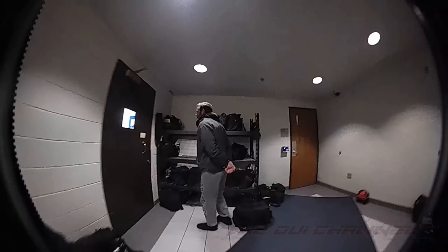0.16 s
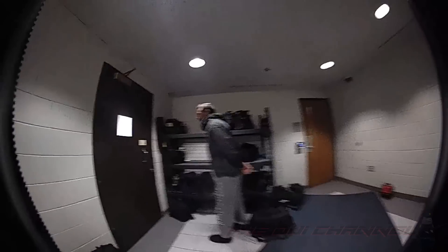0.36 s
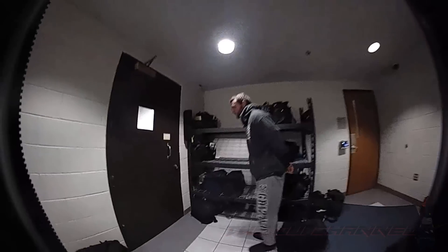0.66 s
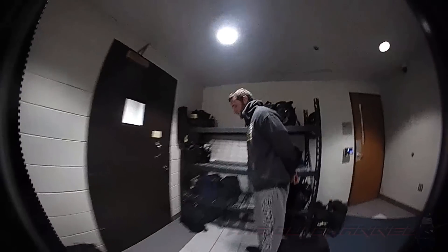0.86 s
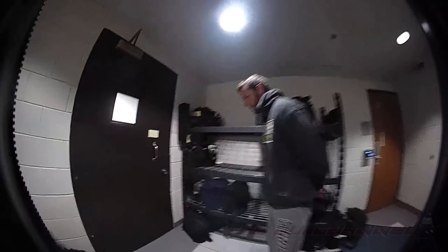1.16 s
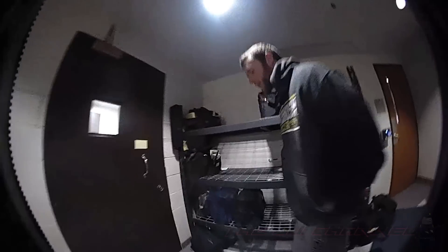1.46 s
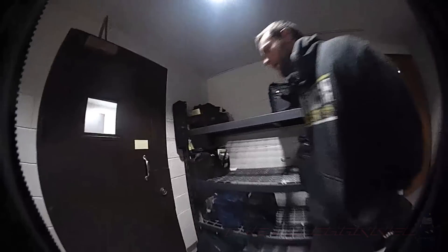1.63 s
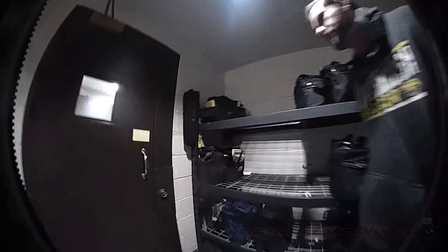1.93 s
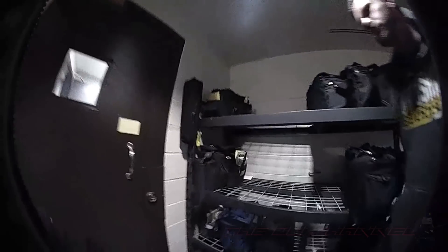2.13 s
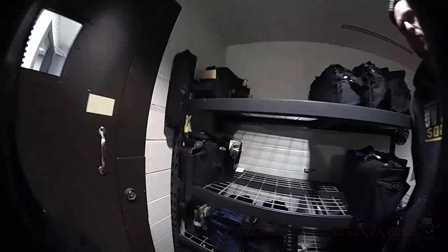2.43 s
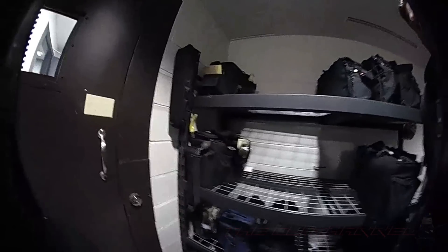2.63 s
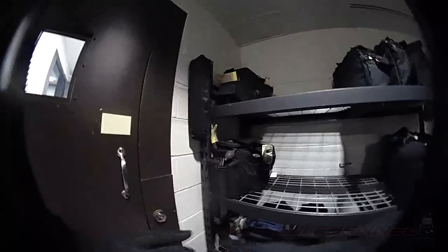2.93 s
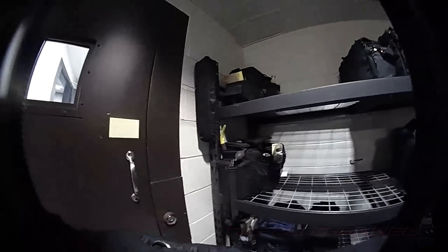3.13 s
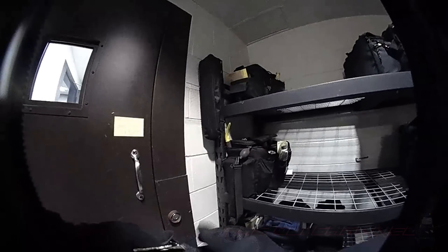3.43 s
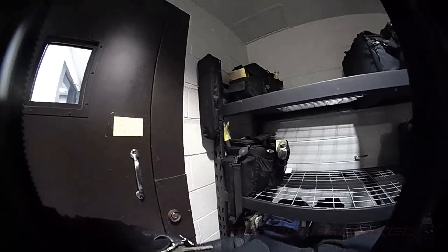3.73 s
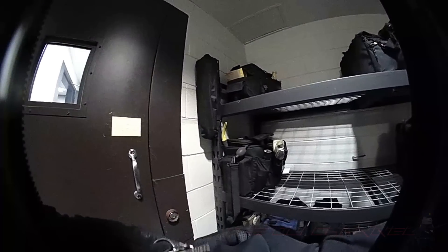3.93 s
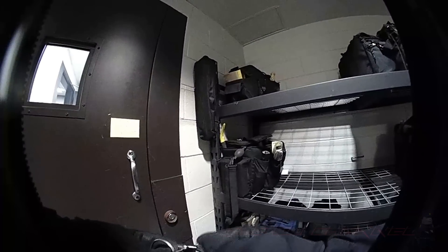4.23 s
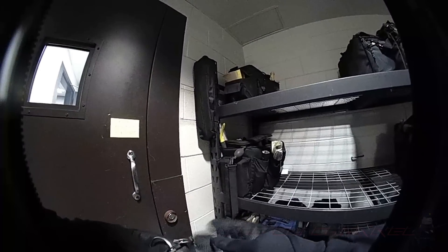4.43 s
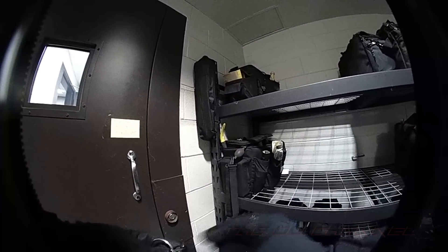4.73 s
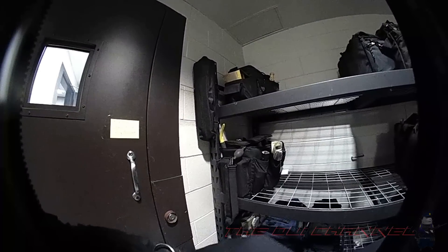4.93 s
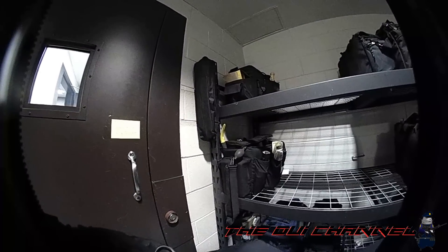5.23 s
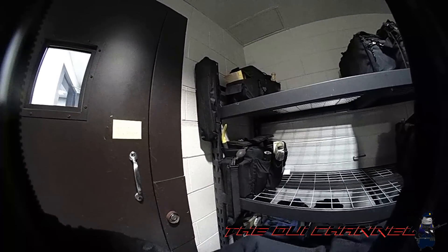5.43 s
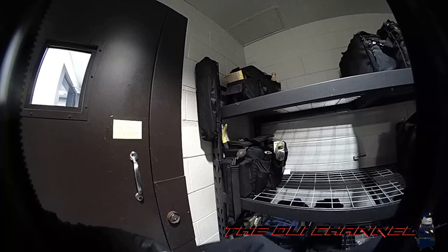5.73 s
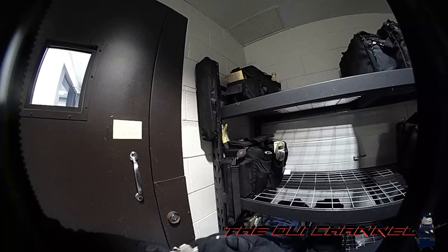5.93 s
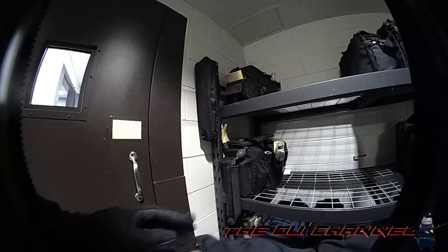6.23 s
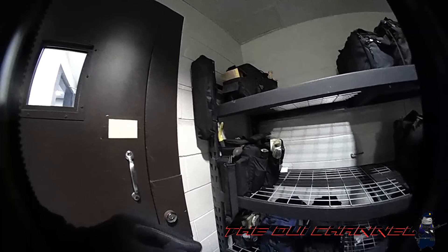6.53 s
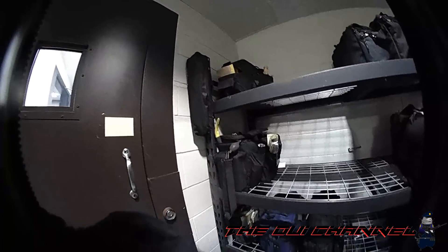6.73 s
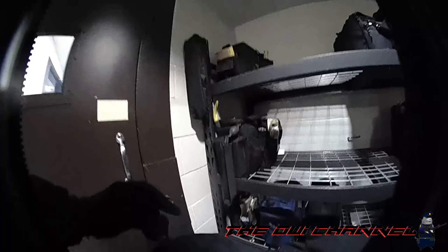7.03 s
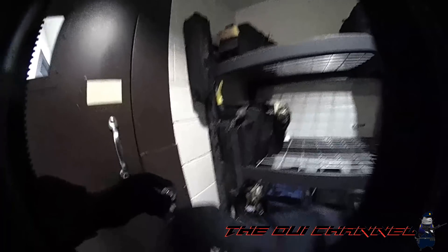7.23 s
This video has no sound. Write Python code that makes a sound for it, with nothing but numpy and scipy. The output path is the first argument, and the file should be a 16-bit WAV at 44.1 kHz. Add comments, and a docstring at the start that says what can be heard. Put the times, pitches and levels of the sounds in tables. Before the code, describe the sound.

A bunch of keys clicks and jingles close to a body-worn microphone in a small, slightly echoing hallway. Before the keys come soft footfalls, swishing clothes, hollow thumps with a brief rumble of air, and one sharp hand slap. The keys start with a quick cluster, thin to scattered ticks, then rattle with short bright rings. A dull knock comes last, and ventilation hums quietly throughout.

```python
"""A small block-walled hallway, heard from a microphone worn on the body. Ventilation hums throughout.
First the wearer steps toward a door: clothing swishes by friction, air buffets the microphone, and near
1 s heavy bumps set something hollow booming. Sleeves rustle, and at 2.6 s a slap of hands rings the air
cupped between them. From 2.8 s the wearer sorts a bunch of keys: they click against each other, and now
and then one hangs free and rings. Dull knocks come last, echoing briefly between the hard walls."""
import sys
import numpy as np
from scipy import signal
from scipy.fft import rfft, irfft, next_fast_len
from scipy.io import wavfile

SR = 44100
rng = np.random.default_rng(int(sys.argv[2]) if len(sys.argv) > 2 else 0)


def wav_out(sig):
    """Save sig, one row per channel (or a flat mono array), as 16-bit PCM at SR to the path in sys.argv[1]."""
    wavfile.write(sys.argv[1], SR, np.round(np.clip(np.atleast_2d(sig).T, -1, 1) * 32767).astype(np.int16))


N = 325017
T = np.arange(N) / SR

# harmonics of the ventilation motor: f/Hz, level/dB
MOTOR_HARMONICS = [(59.6, -60.5), (119.3, -62), (179.5, -66), (238, -82.5)]
# noise spectra of the vent, the jacket and the sleeves: f/Hz, relative spectral level/dB
VENT_SPECTRUM = [(18, 7.5), (39, -2), (75, -7), (139, -4), (291, -13), (627, -22), (900, -31), (3500, -27),
                 (5200, -38), (7600, -52), (10400, -27.5), (14700, -30.5), (16000, -69)]
JACKET_SPECTRUM = [(88, -47), (150, 9), (193, -5.5), (249, -2), (376, -3.5), (612, -6), (1340, -9),
                   (1500, -16), (1980, -10.5), (2810, -12.5), (4760, -11), (10400, -26.5), (11700, -29),
                   (14200, -31), (16000, -69)]
SLEEVE_SPECTRUM = [(88, -48), (150, -7), (226, -4), (321, -2), (504, -1), (979, -5.5), (1190, -3.5),
                   (3040, -5), (5150, -7), (7920, -13.5), (8730, -14.5), (10200, -10.5), (11500, -19.5),
                   (14800, -14.5), (16000, -65)]
# rumble of air passing the microphone as the wearer walks, then stands: t/s, level/dB
AIR_RUMBLE = [(0, -39), (.75, -40), (1.03, -13.5), (1.27, -15), (1.42, -32.5), (1.95, -42.5), (3.12, -39.5),
              (4.2, -48), (5.9, -50.5), (7.37, -42)]
# jacket friction while walking; a faster rub is brighter: t/s, level/dB, brightness/dB
JACKET_RUB = [(0, -51, -2), (.19, -54, 0), (.27, -46.5, -6), (.46, -50, -6), (.6, -52, 2), (.815, -49.5, 5),
              (.838, -35.5, -1), (.89, -30, -2.5), (.965, -32, -1), (1.01, -22.5, 1), (1.045, -29, -2.5),
              (1.2, -29, -10), (1.32, -41.5, -6.5), (1.47, -43.5, -16), (1.55, -50.5, -14), (1.62, -82, 0)]
# knocks and footfalls: t/s, level/dB, centre f/Hz, T60/s, scuff re body/dB
KNOCKS = [(.226, -29.5, 420, 0.32, -12.5), (.285, -34, 314, 0.3, -4.5), (0.829, -43.5, 1056, 0.13, 14),
          (1.382, -35, 390, 0.29, -14), (2.016, -37, 140, 0.11, -10), (2.275, -25.5, 1420, 0.022, -18),
          (6.861, -37, 740, 0.016, -12), (7.289, -31, 370, 0.11, -11), (7.29, -34, 172, 0.29, -10),
          (7.292, -33.5, 1610, 0.031, -24)]
# short noise swells (a footstep's scuff, fabric swishes, the hand slap's dying tail):
# peak t/s, level/dB, lower f/Hz, upper f/Hz, rise/s, fall/s
NOISE_SWELLS = [(.228, -39, 1220, 2820, 0.034, 0.031), (.27, -47, 5430, 7600, 0.04, 0.078),
                (0.721, -41.5, 3900, 9300, 0.099, .14), (1.008, -21.5, 259, 5360, 0.018, 0.024),
                (1.1, -30, 750, 4700, 0.049, 0.037), (1.186, -30.5, 2570, 8160, 0.0071, 0.046),
                (1.577, -39, 3100, 7050, 0.0033, 0.021), (1.645, -40, 6000, 12900, .005, 0.02),
                (1.691, -32.5, 6470, 12000, 0.0025, 0.0034), (2.597, -22, 4530, 14200, 0.0061, .016),
                (2.627, -30, 700, 13000, .005, 0.042), (2.628, -35.5, 495, 1060, 0.02, 0.11),
                (2.748, -23, 3420, 5250, .004, .0022), (2.776, -27, 480, 3350, 0.022, 0.01),
                (2.783, -18.5, 4430, 13300, .0078, .0077)]
# heavy bumps against something hollow: t/s, level/dB, T60/s
BUMPS = [(0.886, -21.5, 0.55), (.985, -25, 0.77), (1.102, -34, 0.41)]
# modes of the hollow body: f/Hz, spread of f (four standard deviations)/Hz, relative level/dB
HOLLOW_MODES = [(95.5, 4, -1), (196.7, 12, -8), (378, 18.5, -7.5)]
# steady rubbing of sleeves and gloves: t/s, level/dB
SLEEVE_RUB = [(1.5, -58.5), (1.6, -57), (2.5, -55), (2.7, -47.5), (2.95, -47), (3.5, -55), (4.4, -65),
              (5.25, -70), (5.7, -65), (6.05, -62), (6.3, -57), (6.8, -60), (7.0, -51.5), (7.37, -49)]
# single rustles of the sleeves: peak t/s, level/dB, Gaussian half-width/s
SLEEVE_RUSTLES = [(1.68, -48.5, 0.07), (2.04, -56, 0.052), (2.367, -46, 0.011), (2.547, -48.5, 0.012),
                  (2.82, -45, 0.023), (4.057, -62, 0.038), (4.748, -53.5, 0.057), (4.975, -53, 0.04),
                  (5.169, -57.5, 0.02), (5.412, -60.5, 0.082), (5.87, -61.5, 0.14)]
# resonances of the air cupped between the hands: f/Hz, bandwidth/Hz, gain/dB
HAND_CAVITY_MODES = [(483, 57, -3.5), (866, 38, 3), (1137, 103, 4.5), (1720, 370, -7.5), (2230, 240, -5.5),
                     (2800, 290, -4), (5460, 900, -23), (7200, 1100, -20)]
# clear touches of key on key: t/s, mid-band level over 10 ms/dB, top band re mid/dB, chatter T60/s
KEY_TOUCHES = [(2.78, -23.5, -6.5, 0.012), (2.981, -45, -4, .017), (2.9983, -38.5, 6, 0.039),
               (3.0448, -37, -7, 0.03), (3.057, -30, -9, 0.025), (3.068, -26, 1.5, 0.084),
               (3.0858, -29.5, -2, 0.037), (3.098, -37, -2, .017), (3.1082, -26.5, -5, 0.093),
               (3.1262, -26, 4, 0.019), (3.142, -26.5, 6.5, 0.064), (3.1569, -23.5, -1.5, 0.0091),
               (3.268, -45, -10, 0.0096), (3.353, -49, 2, 0.0089), (3.37, -38.5, -3, 0.011),
               (3.3756, -40, 2, .007), (3.4198, -43, 3, .006), (3.428, -41, 4, 0.011),
               (3.4626, -39.5, -17, 0.0073), (3.5875, -25.5, -15, 0.0053), (3.5975, -21.5, -17, 0.0042),
               (3.6882, -42, -12, .018), (3.7026, -30, -19, 0.036), (3.7755, -37.5, -21, 0.0068),
               (3.794, -39, 2.5, .015), (3.941, -39, 0, 0.0038), (4.104, -45, -5, 0.02),
               (4.123, -43.5, -5, 0.032), (4.5303, -41, -16, 0.024), (4.5586, -46.5, 1, 0.007),
               (4.7559, -34.5, -5, 0.019), (5.075, -38.5, -6, 0.012), (5.1548, -52.5, -1, .023),
               (5.7941, -36, -1, .026), (5.829, -42, -10, .07), (5.8485, -43, 1, .04),
               (5.8652, -44, -2, .06), (5.876, -32.5, 0.5, .018), (6.098, -41.5, 9, 0.047),
               (6.130, -27, -15, 0.021), (6.139, -30, -5, 0.072), (6.147, -36, 2, 0.12),
               (6.164, -33, 0, 0.044), (6.186, -33, 4, 0.044), (6.1981, -31, -1, 0.081),
               (6.22, -40, 3, 0.03), (6.2414, -35.5, 6, 0.065), (6.263, -29.5, -4, .028),
               (6.272, -32.5, 5.5, .016), (6.3003, -31.5, 6, 0.027), (6.3083, -28, -7, 0.018),
               (6.3197, -32.5, -2, 0.025), (6.3812, -32, -2, 0.064), (6.422, -33, -5, 0.068),
               (6.4533, -38, -8, 0.093), (6.5144, -37.5, 4, 0.016), (6.6495, -37, -7, 0.046),
               (6.7426, -48, 6, 0.011), (6.864, -39, -3, 0.028), (6.8781, -30, 1, 0.097),
               (6.9247, -36.5, -5, 0.033), (6.938, -29, 0, 0.13), (6.9563, -33, -1, 0.11),
               (7.0506, -33, 0.5, 0.014), (7.115, -43.5, 6, 0.0076), (7.1637, -39, -22, 0.019),
               (7.173, -36, -6, .007), (7.185, -34.5, -4.5, 0.051), (7.226, -33, -10, 0.021)]
# resonances of the bunch, damped by the fingers: f/Hz, bandwidth/Hz, gain/dB
BUNCH_MODES = [(1410, 710, -7), (2220, 450, 2), (3290, 360, -2.5), (3910, 110, 7), (4980, 1110, 5.5),
               (5620, 410, 9), (6050, 170, 6.5), (7330, 620, 9), (8480, 910, 0), (10330, 1270, 1),
               (11300, 170, 2.5), (12500, 1100, -4), (13430, 1040, 0)]
# modes of a neighbouring key that is not held: f/Hz, level re touch/dB, T60/s
NEIGHBOUR_MODES = [(4200, -37, .08), (5060, -43, 0.1), (5210, -7.5, 0.064), (5940, -26, 0.18),
                   (7300, -11, 0.072), (10600, -15, 0.06), (12700, -21, 0.073)]
# struck keys hanging free until fingers or neighbours catch them: t/s, mode name, level/dB, time free/s
FREE_KEYS = [(3.044, "clink", -26.5, 0.0016), (3.07, "ping", -23, 0.0018), (3.59, "tick", -32, .001),
             (3.6, "ping", -32, 0.0026), (3.598, "clank", -36, 0.0027), (3.702, "ping", -28, 0.0018),
             (3.942, "chime", -47, 0.02), (4.125, "chime", -54, .02), (4.532, "ping", -45, .004),
             (4.755, "ping", -35.5, 0.0034), (4.757, "tick", -25, 0.0014), (5.093, "tink", -35, 0.0025),
             (6.098, "shimmer", -41, 0.023), (6.098, "glint", -42, 0.013), (6.129, "clank", -42, 0.016),
             (6.147, "shimmer", -27, 0.037), (6.134, "ting", -36, 0.068), (6.144, "ping", -27.5, .004),
             (6.148, "glint", -42, .03), (6.176, "ping", -33, .004), (6.242, "bell", -21, .023),
             (6.31, "ping", -30.5, 0.0036), (6.311, "clank", -41.5, 0.0026), (6.346, "ping", -37.5, .004),
             (6.381, "ping", -33.5, .003), (6.421, "shimmer", -32.5, .003), (6.44, "ping", -35, .003),
             (6.65, "shimmer", -48, 0.038), (6.743, "glint", -52, .02), (6.881, "shimmer", -34, .017),
             (6.88, "glint", -37, .015), (6.938, "shimmer", -30, 0.016), (6.957, "shimmer", -22, 0.0067),
             (7.178, "shimmer", -45, 0.054), (7.224, "ping", -34, .004)]
# modes of a free key, by name: f/Hz, T60 once caught/s, relative level of the lingering tone/dB
FREE_KEY_MODES = {"clank": (1410, 0.022, -32), "clink": (2950, 0.012, -30), "ping": (3935, 0.033, -28),
                  "tink": (4420, .02, -36), "chime": (5205, 0.21, -30), "bell": (5583, .015, -18),
                  "ting": (6300, .06, -30), "tick": (7600, 0.012, -37), "shimmer": (11020, 0.07, -27),
                  "glint": (12310, .08, -22)}
# first reflections off the chest, floor and door: delay/s, amplitude ratio
REFLECTIONS = [(.0026, 0.049), (.0052, 0.12), (.0079, 0.078)]


def from_db(db):
    return 10 ** (np.asarray(db) / 20)


def unit_rms(x):
    return x / np.sqrt(np.mean(x ** 2) + 1e-20)


def curves(rows):
    """Each column after t, interpolated linearly to every sample."""
    times, *columns = np.transpose(rows)
    return [np.interp(T, times, column) for column in columns]


def add(out, start_s, sound):
    at = max(round(start_s * SR), 0)
    out[at:at + len(sound)] += sound[:max(N - at, 0)]


def band(x, low_hz, high_hz, order=2):
    return signal.sosfilt(signal.butter(order, [low_hz, high_hz], "band", fs=SR, output="sos"), x)


def resonate(force, modes):
    """Modal superposition: damped resonators share one force and are summed with alternating signs."""
    out = 0
    for k, (hz, width_hz, db) in enumerate(modes):
        radius = np.exp(-np.pi * width_hz / SR)
        feedback = [1, -2 * radius * np.cos(2 * np.pi * hz / SR), radius ** 2]
        gain = (-1) ** k * from_db(db) * (1 - radius ** 2) / 2
        out = out + gain * signal.lfilter([1, 0, -1], feedback, force + 1e-18)
    return out


def drift(points_per_s):
    """Random fluctuation of unit rms, linear between independent values."""
    return unit_rms(np.interp(T * points_per_s, np.arange(4000), rng.standard_normal(4000)))


def coloured(noise, spectrum, low_hz=15, high_hz=20000):
    """Spectral shaping of noise within one band, to unit rms."""
    size = next_fast_len(N)
    hz = np.maximum(np.arange(size // 2 + 1) * SR / size, 1)
    points_hz, points_db = np.transpose(spectrum)
    gain = from_db(np.interp(np.log(hz), np.log(points_hz), points_db))
    rolloff = np.sqrt((1 + (low_hz / hz) ** 12) * (1 + (hz / high_hz) ** 12))
    return unit_rms(irfft(rfft(noise, size) * gain / rolloff, size)[:N])


def ventilation(air_db=-52.5, waver_db=2.5, wander_rad=0.99):
    """Steady flow noise lies under motor harmonics, slightly modulated in amplitude and phase."""
    hum = 0
    for hz, db in MOTOR_HARMONICS:
        amplitude = np.sqrt(2) * from_db(db + waver_db * drift(5.7))
        hum = hum + amplitude * np.sin(2 * np.pi * hz * T + wander_rad * drift(3.5))
    return hum + from_db(air_db) * coloured(rng.standard_normal(N), VENT_SPECTRUM)


def air_buffet():
    """Flow across the microphone port makes pressure fluctuations: slow heaves and a softer flutter."""
    rumble_db, = curves(AIR_RUMBLE)
    flutter_db = -44.5 + 0.33 * rumble_db
    rumble = unit_rms(band(rng.standard_normal(N), 6, 26, order=3))
    flutter = unit_rms(band(rng.standard_normal(N), 50, 210))
    return from_db(rumble_db) * rumble + from_db(flutter_db) * flutter


def cloth_friction(levels_db, spectrum, grain_db, flutter_db):
    """Stick-slip friction: threads catch and slip in tiny grains under a fluttering pressure."""
    out, pressure = 0, from_db(flutter_db * drift(110))
    bands_hz = ((170, 1000), (1000, 4000), (4000, 16000))  # body, rub, hiss
    for level_db, edges_hz in zip(levels_db, bands_hz):
        grains = rng.standard_normal(N) * from_db(grain_db * np.minimum(rng.exponential(1, N), 6))
        out = out + from_db(level_db) * coloured(grains * pressure, spectrum, *edges_hz)
    return out


def jacket():
    """Friction noise swells with the stride; faster sliding shifts its energy upward in frequency."""
    db, bright_db = curves(JACKET_RUB)
    body_db, rub_db, hiss_db = db - 1.5, db - 1 + bright_db, db - 1 + 1.5 * bright_db
    return cloth_friction((body_db, rub_db, hiss_db), JACKET_SPECTRUM, grain_db=1.5, flutter_db=1.23)


def knocks(relative_bandwidth=0.29):
    """A dull impact excites one heavily damped resonance, while the surfaces scuff."""
    out, t = np.zeros(N), T[:SR // 2]
    for start_s, db, hz, t60, scuff_db in KNOCKS:
        body_noise, scuff_noise = rng.standard_normal((2, len(t)))
        decay = from_db(-60 * t / t60)
        resonance = resonate(body_noise, [(hz, hz * relative_bandwidth, 0)])
        body = unit_rms(band(resonance, hz / 2, hz * 2, order=1) * decay)
        scuff = unit_rms(band(scuff_noise, 460, 5000) * decay)
        rms = from_db(db) * np.sqrt(np.mean(decay ** 2))
        add(out, start_s, rms * (body + from_db(scuff_db) * scuff))
    return out


def noise_swells(lead_s=0.25):
    """Exponential growth and decay of band noise: a footstep's scuff, fabric swishes, the slap's tail."""
    out, t = np.zeros(N), T[:SR // 2] - lead_s
    for peak_s, db, low_hz, high_hz, rise_s, fall_s in NOISE_SWELLS:
        swell = np.exp(np.minimum(t / rise_s, -t / fall_s))
        noise = unit_rms(band(rng.standard_normal(len(t)), low_hz, high_hz))
        add(out, peak_s - lead_s, from_db(db) * swell * noise)
    return out


def hollow_bumps(push_s=0.0071):
    """A soft, heavy push excites the low modes of a hollow body, which decay slowly."""
    out, t = np.zeros(N), T[:SR // 2]
    onset = 1 - np.exp(-t / push_s)
    for start_s, db, t60 in BUMPS:
        boom = sum(from_db(mode_db) * np.sin(2 * np.pi * (hz + spread_hz / 4 * rng.normal()) * t)
                   for hz, spread_hz, mode_db in HOLLOW_MODES)
        add(out, start_s, from_db(db - 60 * t / t60) * onset * boom)
    return out


def sleeves(firm_db=-52.5):
    """Incoherent sources add in power: a steady light rubbing and a rustle with each move of the arms."""
    power = from_db(curves(SLEEVE_RUB)[0]) ** 2
    for peak_s, db, half_width_s in SLEEVE_RUSTLES:
        power += from_db(db) ** 2 * np.exp(-((T - peak_s) / half_width_s) ** 2)
    rub_db = 10 * np.log10(power)
    # a lighter touch leaves less body and relatively more hiss
    body_db = firm_db - 1.5 + 1.12 * (rub_db - firm_db)
    hiss_db = firm_db + 3 + 0.97 * (rub_db - firm_db)
    return cloth_friction((body_db, rub_db, hiss_db), SLEEVE_SPECTRUM, grain_db=3.0, flutter_db=1.9)


def hand_slap(start_s=2.5885, level_db=-17.5, t60=0.084, crack=13.4):
    """Cavity resonance: an impulse and a short noise burst ring the air cupped between the hands."""
    out, t = np.zeros(N), T[:SR // 4]
    force = rng.standard_normal(len(t)) * from_db(-60 * t / t60)
    force[0] += crack
    cavity = resonate(force, HAND_CAVITY_MODES)
    add(out, start_s, from_db(level_db) * cavity / cavity[:SR // 100].std())
    return out


def key_contacts(settle_chance=0.5, settle_s=0.0081, strays=16, sort_from_s=2.95, sort_to_s=7.35):
    """Collisions of keys: the clear touches, lighter ones as they settle, and faint stray ticks."""
    contacts = list(KEY_TOUCHES)
    for start_s, db, bright_db, t60 in KEY_TOUCHES:
        chance, wait = rng.random(2)
        if chance < settle_chance:
            contacts.append((start_s + settle_s * (0.5 + wait), db - 10.5, bright_db, t60))
    for k in range(strays):
        start_s = sort_from_s + (sort_to_s - sort_from_s) * (k + rng.random()) / strays
        contacts.append((start_s, rng.uniform(-54.5, -53.5), -11, 0.0085))
    return contacts


def key_clicks(chatter=0.445, bounces_per_s=2800, grain_db=4.5, variety_db=3.0, size_spread=0.032):
    """An impact and a dying chatter of bounces excite the bunch's modes, which shift with key size."""
    out, t = np.zeros(N), T[:SR // 8]
    bands_hz = ((1000, 3500), (3500, 9000), (9000, 16000))  # low, mid, top
    usual_t60, usual_db = 0.023, -35
    for start_s, db, bright_db, t60 in key_contacts():
        strengths = rng.standard_normal(len(t)) * from_db(grain_db * rng.uniform(-0.077, 1, len(t)))
        bounces = unit_rms(strengths * (rng.random(len(t)) < bounces_per_s / SR))
        force = chatter * bounces * from_db(-60 * t / t60)
        force[0] += 1
        modes = [(hz * np.exp(size_spread * rng.normal()), width_hz, mode_db + variety_db * rng.normal())
                 for hz, width_hz, mode_db in BUNCH_MODES]
        click = resonate(force, modes)
        # a long chatter means a loose bunch: fuller lows, more ring; hard touches gain less in the lows
        looseness = np.log2(t60 / usual_t60)
        low_db = -14 + 2 * looseness - 0.22 * (db - usual_db)
        for edges_hz, share_db in zip(bands_hz, (low_db, 0, bright_db)):
            part = band(click, *edges_hz, order=3)
            rms_over_10ms = np.sqrt(np.sum(part ** 2) / (SR / 100))
            add(out, start_s, from_db(db + share_db) * part / rms_over_10ms)
        # neighbouring keys ring on faintly
        for hz, mode_db, ring_t60 in NEIGHBOUR_MODES:
            ring_db = db + mode_db + bright_db * (hz > 9000) + 0.5 * looseness
            ring_db += variety_db * rng.uniform(-0.88, 1)
            tone = np.sin(2 * np.pi * (hz + 10 * rng.normal()) * t)
            add(out, start_s, from_db(ring_db - 60 * t / ring_t60) * tone)
    return out


def free_keys(sag_db_per_s=110, twin_share=0.3, beat_hz=70, linger_t60=0.67):
    """A key in free vibration beats with a like key; once caught it is damped to a faint lasting tone."""
    out, t = np.zeros(N), T[:SR // 2]
    for start_s, name, db, free_s in FREE_KEYS:
        hz, caught_t60, linger_db = FREE_KEY_MODES[name]
        free_loss_db = sag_db_per_s * np.minimum(t, free_s)
        caught_loss_db = 60 * np.maximum(t - free_s, 0) / caught_t60
        decay = from_db(-free_loss_db - caught_loss_db)
        linger = from_db(linger_db - 60 * t / linger_t60)
        tone = np.maximum(decay, linger) * np.sin(2 * np.pi * hz * t)
        twin = decay * np.sin(2 * np.pi * (hz + beat_hz * rng.uniform(0.57, 1.1)) * t)
        add(out, start_s, from_db(db) * (tone + twin_share * twin))
    return out


def near_reflections(x):
    """Comb filtering: close reflections interfere with the direct sound and ripple its spectrum."""
    reflected = sum(share * np.interp(T - delay_s, T, x, left=0) for delay_s, share in REFLECTIONS)
    return (x + reflected) / np.sqrt(1 + sum(share ** 2 for _, share in REFLECTIONS))


def hallway(x, low_t60=0.58, treble_t60=0.27, treble_db=-2.5, first_wall_s=0.0068):
    """Reverberation: a diffuse field between hard walls decays exponentially, the treble first."""
    t = T[:SR]
    lows = band(rng.standard_normal(SR), 115, 3400) * from_db(-60 * t / low_t60)
    treble = band(rng.standard_normal(SR), 1700, 16000) * from_db(treble_db - 60 * t / treble_t60)
    tail = (lows + treble) * (t > first_wall_s)
    return signal.fftconvolve(x, tail / np.sqrt(np.sum(tail ** 2)))[:N]


def scene():
    """Superposition of the close sounds, the hallway's reverberation and the moving air."""
    keys = key_clicks() + free_keys()
    blows = knocks()
    swells = near_reflections(noise_swells())
    slap = hand_slap()
    clothes = near_reflections(jacket() + sleeves())
    echoes = hallway(from_db(-20) * keys + from_db(-13) * blows
                     + from_db(-11.5) * swells + from_db(-15) * slap)
    return keys + blows + swells + slap + hollow_bumps() + clothes + echoes + air_buffet() + ventilation()


def record(dry, cutoff_hz=15700):
    """Band limiting: a steep low-pass removes the highest treble from the single channel."""
    return signal.sosfilt(signal.ellip(10, 0.2, 80, cutoff_hz, fs=SR, output="sos"), dry)[None]


dry = scene()
out = record(dry)
wav_out(out)
```